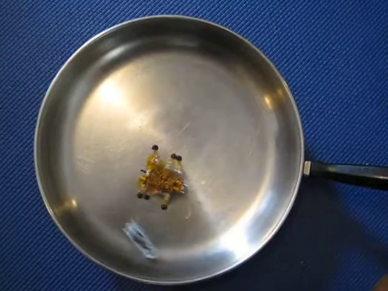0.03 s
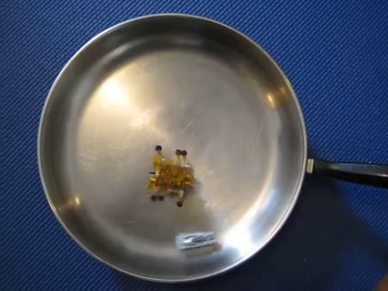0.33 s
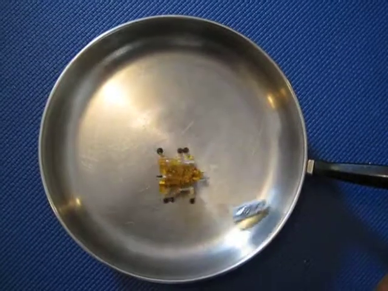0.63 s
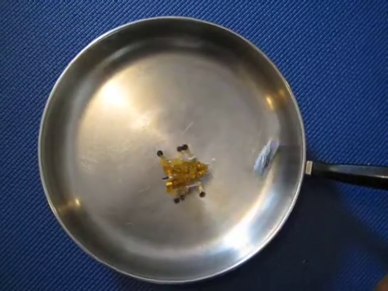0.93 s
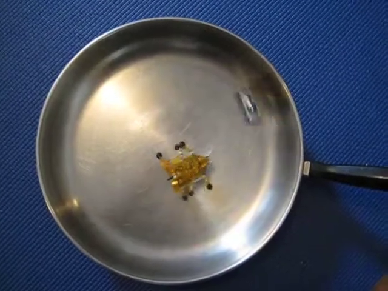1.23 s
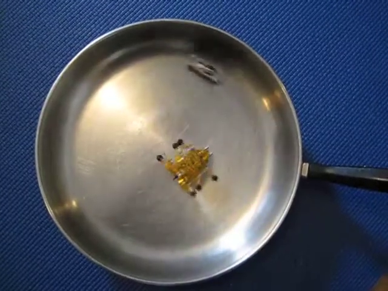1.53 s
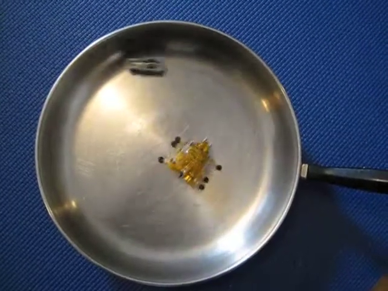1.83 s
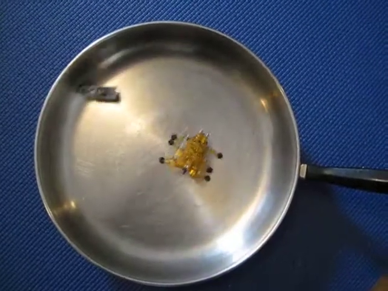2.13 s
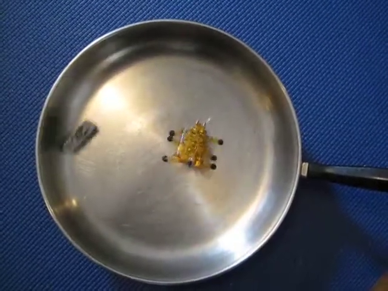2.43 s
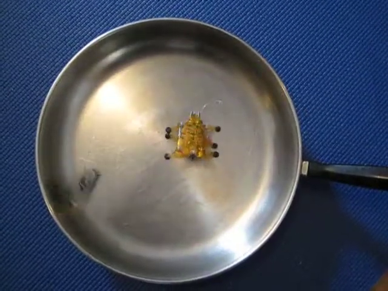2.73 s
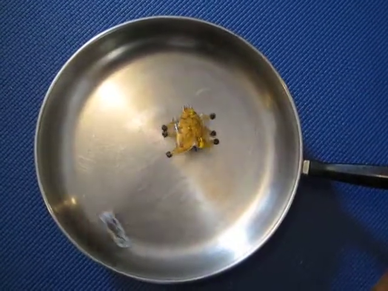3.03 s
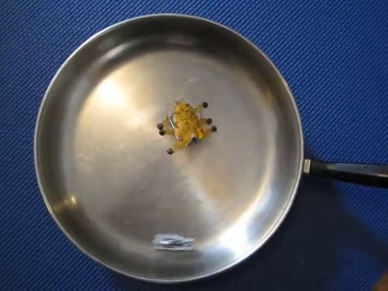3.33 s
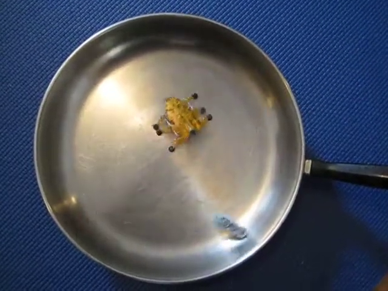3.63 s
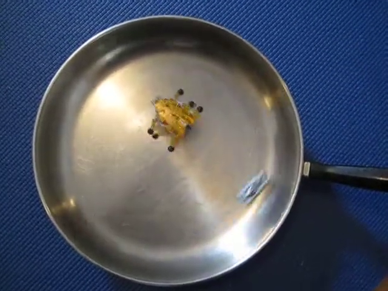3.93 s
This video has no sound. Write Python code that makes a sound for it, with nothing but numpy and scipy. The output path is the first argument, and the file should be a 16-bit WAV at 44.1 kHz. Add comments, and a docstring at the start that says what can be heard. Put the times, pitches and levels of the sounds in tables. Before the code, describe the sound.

The bright, pulsing whir of a wind-up toy runs throughout, with sharp leg taps on a steel pan. A second toy buzzes softly against the pan, and scattered knocks ring briefly in a small room.

```python
"""Two toy bugs in a steel frying pan

A clockwork bug whirs in the middle: its meshing gears whine, rattle and rasp as the speed swings
once per wheel turn, and its legs tap the steel. A vibrating bug runs round the rim, its feet
driving the pan's resonances into a drone. Now and then a toy knocks on the metal, which rings in
free decay. A small room reverberates after the knocks, the taps, some soft scuffs and a dull thud."""
import sys
import numpy as np
from scipy import signal
from scipy.fft import rfft, irfft, next_fast_len
from scipy.io import wavfile
from scipy.ndimage import uniform_filter1d

SR = 44100
rng = np.random.default_rng(int(sys.argv[2]) if len(sys.argv) > 2 else 0)


def master_out(mix):
    """Clip the mix to full scale and print it as 16-bit PCM to the path in sys.argv[1]."""
    frames = np.transpose(np.atleast_2d(mix))
    ceiling = np.clip(frames, -1, 1)
    pcm = np.round(ceiling * 32767).astype(np.int16)
    wavfile.write(sys.argv[1], SR, pcm)


N = 176400
T = np.arange(N) / SR

# nominal motor speed through one wheel turn, from its slowest moment: (time [s], speed [Hz])
TURN_SPEED = [(0, 258.3), (.015, 261.5), (.03, 270), (.05, 280), (.08, 287), (.1, 284), (.125, 277),
              (.15, 272.5), (.175, 275), (.2, 269), (.25, 265.5), (.272, 264)]
# slow change of the motor's pace: (time [s], speed factor [ratio])
PACE = [(0, 1), (1.05, 1), (1.4, 1.005), (2.2, 1.005), (2.6, .997), (3.5, .999), (4, .992)]
# whine partials: (order [multiple of speed], base level [dB], slope above cruising speed [dB/Hz])
GEAR_ORDERS = [(24, -52, -.2), (27, -52, .2), (30, -50, .14), (31, -58, 0), (32, -51, -.05),
               (33, -44.3, -.38), (34, -45, -.58), (35, -50, -.5), (36, -46.8, -.28), (54, -68, -.1)]
# resonances of the plastic case: (frequency [Hz], bandwidth [Hz], lift [dB])
CASE_MODES = [(8620, 280, 7.5), (9030, 190, 6.5)]
# spectrum of the gear rattle: (frequency [Hz], relative level [dB])
RATTLE_SPECTRUM = [(150, -24.5), (400, -24), (1000, -13.5), (1500, -22), (2150, -19), (2500, -9),
                   (3250, -12.5), (3900, -12), (4400, -9.5), (4750, -11.5), (5750, 1.5), (6100, 0),
                   (6400, 3.5), (6600, -2.5), (6820, 2.5), (7200, 0), (7570, -6), (8050, 2.5), (8750, -6),
                   (9450, -11), (10300, -4.5), (11700, -16), (13000, -19), (15800, -27)]
# spectrum of the sharp ticks of legs and gears: (frequency [Hz], relative level [dB])
TICK_SPECTRUM = [(150, -37), (500, -16), (2000, -26), (2800, -2), (4700, -10), (6000, 7.5), (7600, 11),
                 (9300, -7), (10300, 10), (11500, -4.5), (13000, -4), (15800, -34)]
# resonances of the metal gears and legs: (frequency [Hz], bandwidth [Hz], base level [dB])
GEAR_MODES = [(3190, 150, -60), (5780, 160, -55.5), (6100, 96, -48.5), (6380, 190, -52), (6740, 170, -49),
              (8870, 370, -49), (12450, 450, -63), (13900, 400, -73)]
# envelope of one bright ring that grows, then falls away: (time [s], base level [dB])
ZING_ENVELOPE = [(0, -52), (1.2, -49), (2.6, -50), (2.95, -44.5), (3.6, -42), (4, -53)]
# low resonances of the pan: (frequency [Hz], bandwidth [Hz], relative level [dB])
PAN_LOW_MODES = [(87.3, 23, -8), (125.3, 17.3, 0.5), (150.9, 8.9, 4), (202.6, 14, -3.5), (245, 33.3, -3)]
# high resonances of the pan: (frequency [Hz], bandwidth [Hz], relative level [dB])
PAN_HIGH_MODES = [(479, 30, 4), (665, 224, 1.5), (820, 640, -3.5), (1125, 128, -0.5), (1700, 56, -4.5),
                  (2440, 26, -6), (3132, 71, 2), (4393, 71, 4)]
# envelope of the pan's low drone: (time [s], relative level [dB])
DRONE_ENVELOPE = [(0, -39.5), (.12, -53), (.29, -48.5), (.37, -42.5), (.49, -40), (.56, -53), (.76, -49),
                  (.81, -40), (.93, -43.5), (1.06, -49), (1.18, -47), (1.27, -40), (1.36, -45),
                  (1.44, -48.5), (1.53, -41.5), (1.61, -39.5), (1.7, -50), (1.85, -44.5), (1.94, -52.5),
                  (3.2, -48.5), (3.34, -41.5), (3.42, -41.5), (3.51, -49), (3.85, -41), (4, -45)]
# spectrum of the room noise: (frequency [Hz], relative level [dB])
AMBIENT_SPECTRUM = [(20, 0.5), (60, 1.5), (150, 9), (300, -1.5), (600, -9), (1500, -24), (8000, -36)]
# rasps at the fast part of each turn: (time [s], level [dB], duration [s])
RASPS = [(0.304, -34, 0.012), (0.592, -39, 0.043), (0.892, -41, 0.05), (1.194, -38.5, 0.034),
         (1.504, -40, 0.02), (1.756, -41, 0.046), (2.056, -42, 0.067), (2.36, -38.5, 0.042),
         (2.662, -37, 0.026), (2.951, -40, 0.035), (3.257, -41, 0.025), (3.559, -39.5, 0.032)]
# spectrum of the rasps: (frequency [Hz], relative level [dB])
RASP_SPECTRUM = [(150, -38), (500, -15), (2000, -8.5), (2900, 5), (4700, -1.5), (6000, 2), (7600, -4),
                 (9300, 10), (10300, 6), (11400, 0.5), (12300, -6), (13500, -11), (15800, -17)]
# taps of the legs on the steel: (time [s], level [dB])
LEG_TAPS = [(0.3045, -21), (0.5916, -26), (0.604, -26), (0.9378, -25), (1.3124, -24), (1.499, -22),
            (1.7629, -26), (1.7809, -27), (2.0383, -23), (2.5311, -25.5), (2.6668, -20.5), (2.686, -22),
            (2.957, -26.5), (2.98, -27), (3.236, -26.5), (3.241, -26.5), (3.284, -21.5), (3.381, -25),
            (3.5643, -28), (3.6127, -24.5), (3.6606, -25)]
# spectrum of the reverberation: (frequency [Hz], relative level [dB])
REVERB_SPECTRUM = [(200, 3), (1200, 8), (2800, -1.5), (6000, -8), (15000, -1.5)]
# soft scuffs: (time [s], level [dB], centre frequency [Hz], bandwidth [Hz], duration [s])
SCUFFS = [(0.584, -41.5, 940, 422, 0.023), (2.642, -51.5, 800, 700, 0.032), (2.889, -47, 700, 600, 0.005),
          (3.731, -43.5, 524, 466, 0.0098), (3.994, -35.5, 556, 453, 0.0085)]
# blows on the pan: (time [s], level [dB], brightness [dB], rebound delay [s], rebound gain [dB])
KNOCKS = [(1.03, -19.5, -5.5, .003, -12), (2.0183, -22, -1, .003, -38), (2.161, -19, -1, .0045, -33),
          (2.3454, -19.5, 0, 0.0029, -18), (2.6962, -18.5, -6.5, 0.0032, -21),
          (3.5183, -26.5, -1, 0.0032, -19), (3.7824, -14.3, 3, .002, -44)]
# spectrum of a blow's crack: (frequency [Hz], relative level [dB])
CRACK_SPECTRUM = [(200, -17), (1100, 1.5), (3700, 6.5), (4700, -10), (8000, 4.5), (10500, 0), (12000, -3),
                  (16000, -12)]
# modes excited by a blow: (frequency [Hz], relative level [dB], decay time T60 [s])
KNOCK_MODES = [(232, -34, 0.1), (535, -13, 0.018), (654, -15, 0.033), (1024, -14, 0.02),
               (1206, -11.5, 0.036), (1840, -8, 0.015), (1976, -9.5, 0.019), (2470, -4.5, 0.022),
               (3520, -5.5, 0.014), (3760, -10, 0.015), (4490, -13, 0.012), (6407, 0, 0.038),
               (9000, -24, 0.021), (9400, -12.5, 0.025)]
# the two pulses of the thud: (time [s], level [dB])
THUDS = [(2.583, -28), (2.5936, -28.5)]
# modes of the thud: (frequency [Hz], relative level [dB], decay time T60 [s])
THUD_MODES = [(90, -14, 0.072), (200, -32, 0.018), (450, -2.5, 0.026), (740, -11, 0.018),
              (1030, -14.5, 0.019)]

CRUISE_HZ, MID_SPEED_HZ = 265, 270
TEETH_PER_S, TEETH_SPREAD_DB = 9000, 4


def from_db(db):
    """Amplitude grows tenfold for every 20 dB."""
    return 10 ** (np.asarray(db) / 20)


def unit_rms(x):
    """Normalisation to unit mean power."""
    return x / np.sqrt(np.mean(x ** 2) + 1e-20)


def evened(x, window_s=.07):
    """Division by the running rms flattens the envelope."""
    return x / np.sqrt(abs(uniform_filter1d(x ** 2, int(window_s * SR))) + 1e-20)


def drift(rate_hz):
    """Low-pass filtered noise wanders slowly, with unit rms."""
    step, settle = 40, 2000  # samples per point; points dropped while the filter settles
    pole = np.exp(-2 * np.pi * rate_hz * step / SR)
    noise = rng.standard_normal(N // step + settle + 2)
    slow = signal.lfilter([1], [1, -2 * pole, pole * pole], noise)[settle:]
    return np.interp(np.arange(N) / step, np.arange(len(slow)), unit_rms(slow))


def coloured(x, spectrum):
    """A minimum-phase filter of unit power gain imposes a spectral envelope causally."""
    size = next_fast_len(N + SR // 10)
    hz, db = np.transpose(spectrum)
    bin_hz = np.arange(size // 2 + 1) * SR / size
    gain = from_db(np.interp(np.log(bin_hz + 1), np.log(hz), db))
    cepstrum = irfft(np.log(unit_rms(gain)), size)
    cepstrum[1:size // 2] *= 2
    cepstrum[size // 2 + 1:] = 0
    return irfft(rfft(x, size) * np.exp(rfft(cepstrum)), size)[:N]


def resonance(x, hz, width):
    """Forced response of a damped resonator, with unit gain at its peak."""
    r, w = np.exp(-np.pi * width / SR), 2 * np.pi * hz / SR
    numerator = np.array([1, 0, -1]) * (1 - r * r) / 2
    return signal.lfilter(numerator, [1, -2 * r * np.cos(w), r * r], x + 1e-18)


def ring(clicks, hz, t60):
    """Free vibration of one mode: each impulse starts an exponentially damped sine."""
    r, w = np.exp(-np.log(1000) / (t60 * SR)), 2 * np.pi * hz / SR
    return signal.lfilter([0, np.sin(w)], [1, -2 * r * np.cos(w), r * r], clicks + 1e-18)


def impulses(times, db):
    """Brief impacts idealised as single-sample impulses."""
    return np.bincount((np.asarray(times) * SR).astype(int), from_db(db), N)[:N]


def contacts(per_s, spread_db):
    """Independent contacts form a Poisson impulse train of uneven strength and unit rms."""
    sizes = from_db(spread_db * np.minimum(rng.exponential(1, N), 4))
    signs = rng.choice([-1, 1], N)
    return unit_rms(sizes * signs * (rng.random(N) < per_s / SR))


def bursts(clicks, t60):
    """Each impulse starts a noise burst with exponential decay."""
    pole = np.exp(-np.log(1000) / (t60 * SR))
    return signal.lfilter([1], [1, -pole], clicks + 1e-18) * rng.standard_normal(N)


def swell(time, duration):
    """A Gaussian envelope; the duration spans two standard deviations."""
    return np.exp(-2 * ((T - time) / duration) ** 2)


def motor_speed(turn_s=.2975, slowest_at_s=.2215):
    """Frequency modulation: the clockwork slows and races once per wheel turn."""
    cycle_hz = np.interp(T - slowest_at_s, *np.transpose(TURN_SPEED), period=turn_s)
    pace = np.interp(T, *np.transpose(PACE))
    return cycle_hz * pace * (1 + .0013 * drift(8))


def gear_whine(speed, angle):
    """Harmonics of the rotor's hum swell as they glide through the resonances of the case."""
    racing_hz = np.maximum(speed - CRUISE_HZ, 0)
    acceleration = uniform_filter1d(np.gradient(speed) * SR, size=900)
    load_db = .003 * acceleration  # louder while the gears speed up
    hum = from_db(-58.5 + 4 * drift(9.1)) * np.sin(angle)
    whine = np.zeros(N)
    for order, db, db_per_hz in GEAR_ORDERS:
        case_db = sum(lift / (1 + (2 * (order * speed - hz) / width) ** 2)
                      for hz, width, lift in CASE_MODES)
        phase = order * angle + rng.uniform(0, 2 * np.pi) + .22 * drift(30)  # jitter roughens the tone
        flicker_db = 1.1 * drift(18)
        whine += from_db(db + db_per_hz * racing_hz + case_db + load_db + flicker_db) * np.sin(phase)
    return hum + whine


def gear_rattle(excess_hz, angle):
    """Dense tooth contacts merge into shot noise; sharper chatter rises as the motor races."""
    teeth = contacts(TEETH_PER_S, TEETH_SPREAD_DB) * (1 + .1 * np.cos(angle))
    flutter_db = 1.65 * drift(37)
    teeth *= from_db(-38.5 + .0669 * excess_hz + flutter_db)
    chatter = unit_rms(bursts(abs(contacts(per_s=190, spread_db=1.5)), t60=.0011))
    chatter *= from_db(-45.5 + .13 * excess_hz)
    return coloured(teeth, RATTLE_SPECTRUM) + coloured(chatter, TICK_SPECTRUM)


def gear_rings(excess_hz):
    """Tooth contacts force small metal parts into resonance, harder as the motor races."""
    teeth = contacts(TEETH_PER_S, TEETH_SPREAD_DB)
    rings = sum((-1) ** k * from_db(db) * unit_rms(resonance(teeth, hz, width))
                for k, (hz, width, db) in enumerate(GEAR_MODES))
    zing = evened(resonance(teeth, hz=7580, width=140))
    zing_db = np.interp(T, *np.transpose(ZING_ENVELOPE)) + .1854 * excess_hz
    return rings * from_db(.04 * excess_hz) + zing * from_db(zing_db)


def gear_snaps(excess_hz, hz=10280, width=1140):
    """Sudden release: single teeth snap free in thin, bright, band-limited pulses."""
    releases = contacts(per_s=100, spread_db=2.2)
    snaps = resonance(resonance(releases, hz, width), hz, width)
    return unit_rms(snaps) * from_db(-49.5 + .1036 * excess_hz)


def pan_response(feet, modes):
    """Modal superposition: the pan's resonances add with alternating sign, scaled to unit rms."""
    return unit_rms(sum((-1) ** k * from_db(db) * resonance(feet, hz, width)
                        for k, (hz, width, db) in enumerate(modes)))


def pan_drone(feet_per_s=500):
    """Forced vibration: the vibrating bug's pattering feet sustain the pan's modes."""
    low = pan_response(contacts(feet_per_s, spread_db=5.2), PAN_LOW_MODES)
    high = pan_response(contacts(feet_per_s, spread_db=.58), PAN_HIGH_MODES)
    low_db = np.interp(T, *np.transpose(DRONE_ENVELOPE)) - 2
    return evened(low) * from_db(low_db) + high * from_db(-54)


def room_noise(level_db=-51.5):
    """Stationary background noise, with most of its power at low frequencies."""
    return from_db(level_db) * unit_rms(coloured(rng.standard_normal(N), AMBIENT_SPECTRUM))


def gear_rasps():
    """Skipping teeth make runs of impacts so rapid that they fuse into a bright rasp."""
    envelope = sum(from_db(db) * swell(time, duration) for time, db, duration in RASPS)
    skips = unit_rms(bursts(abs(contacts(per_s=960, spread_db=2)), t60=.0022))
    return coloured(envelope * skips, RASP_SPECTRUM)


def leg_taps():
    """Short contacts have broad spectra: the clockwork bug's legs tick on the steel."""
    return coloured(bursts(impulses(*np.transpose(LEG_TAPS)), t60=.009), TICK_SPECTRUM)


def reverberation(x, t60=.38, gap_s=.004, gain_db=-11):
    """The room's diffuse reflections decay exponentially, duller than the direct sound."""
    t = T[:SR // 2]
    tail = rng.standard_normal(len(t)) * np.exp(-np.log(1000) * t / t60) * (t > gap_s)
    reflections = signal.fftconvolve(x, tail / np.linalg.norm(tail))[:N]
    return from_db(gain_db) * coloured(reflections, REVERB_SPECTRUM)


def scuffs():
    """Band-limited noise with a smooth onset and decay is heard as a soft scuff."""
    out = np.zeros(N)
    for time, db, hz, width, duration in SCUFFS:
        band = resonance(resonance(rng.standard_normal(N), hz, width), hz, width)
        out += from_db(db) * swell(time, duration) * unit_rms(band)
    return out


def knocks(bright_above_hz=5000):
    """Impact excitation: a toy hits the pan with a crack, rebounds once and leaves modes ringing."""
    times, db, bright_db, rebound_s, rebound_db = np.transpose(KNOCKS)

    def strikes(level_db):
        """An inelastic collision: each blow is followed by a weaker rebound."""
        return impulses(times, level_db) + impulses(times + rebound_s, level_db + rebound_db)

    crack = bursts(strikes(db - 7 + .5 * bright_db), t60=.022)
    out = coloured(crack, CRACK_SPECTRUM)
    for k, (hz, mode_db, t60) in enumerate(KNOCK_MODES):
        strike_db = db + mode_db + bright_db * (hz > bright_above_hz) + rng.normal(0, 1, len(times))
        out += (-1) ** k * ring(strikes(strike_db), hz, t60)
    return out


def double_thud():
    """Two impulses excite low, heavily damped modes, which sound dull."""
    pulses = impulses(*np.transpose(THUDS))
    return -sum(from_db(db) * ring(pulses, hz, t60) for hz, db, t60 in THUD_MODES)


def scene():
    """Linear superposition of toys, pan and room; one motor speed governs whine and rattle."""
    speed = motor_speed()
    angle = 2 * np.pi * np.cumsum(speed) / SR
    excess_hz = speed - MID_SPEED_HZ
    gears = gear_whine(speed, angle) + gear_rattle(excess_hz, angle)
    gears += gear_rings(excess_hz) + gear_snaps(excess_hz) + gear_rasps()
    hits = leg_taps() + scuffs() + knocks() + double_thud()
    return (gears + pan_drone() + room_noise() + hits + reverberation(hits))[None]


def record(dry, cutoff_hz=15850):
    """Band limiting: an elliptic low-pass filter cuts the top of the treble steeply."""
    return signal.sosfilt(signal.ellip(12, .1, 80, cutoff_hz, fs=SR, output="sos"), dry)


dry = scene()
out = record(dry)
master_out(out)
```